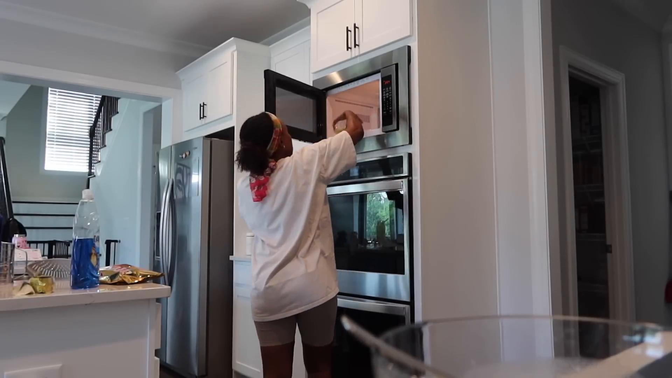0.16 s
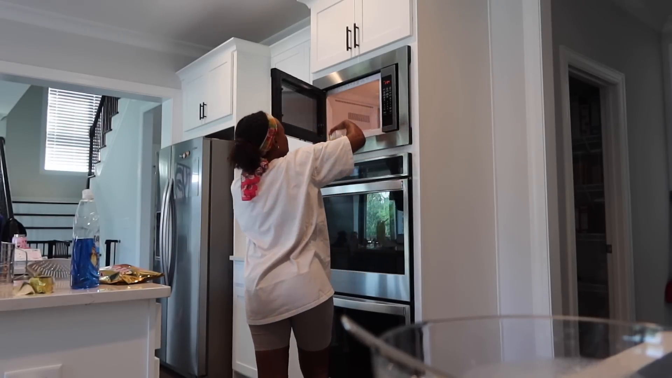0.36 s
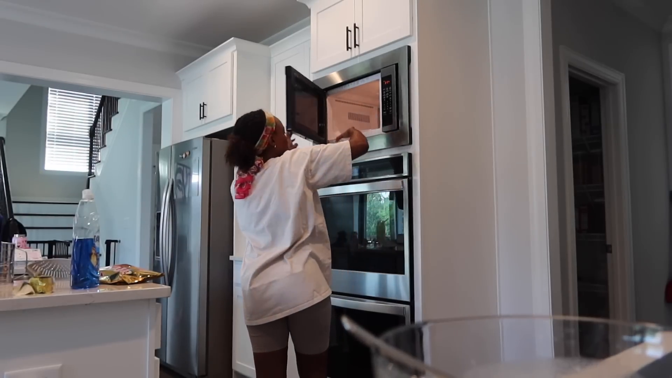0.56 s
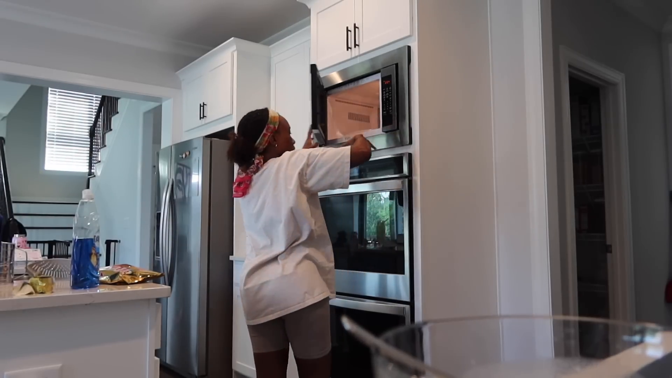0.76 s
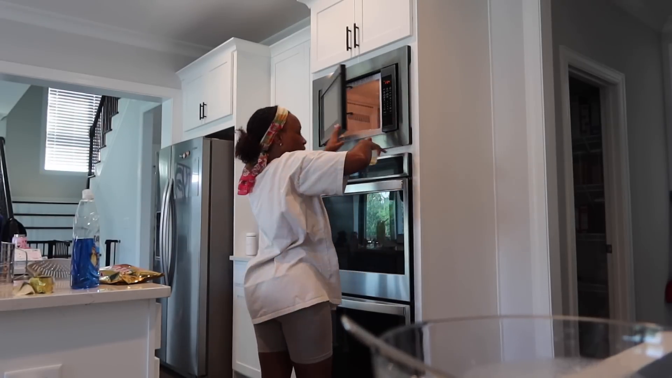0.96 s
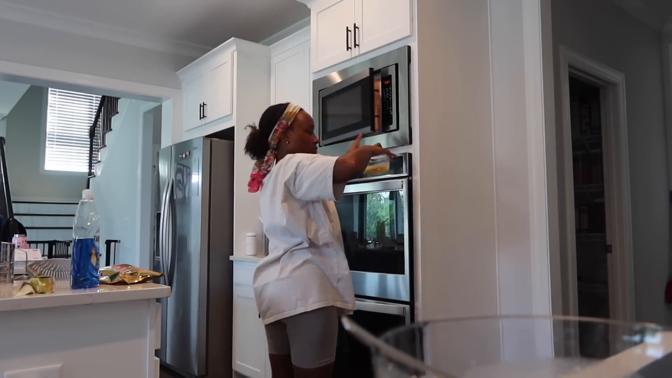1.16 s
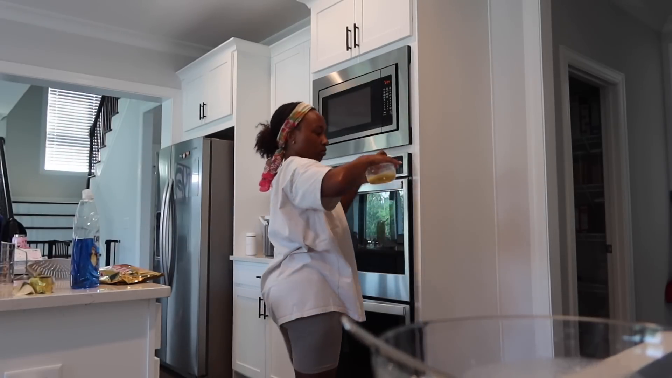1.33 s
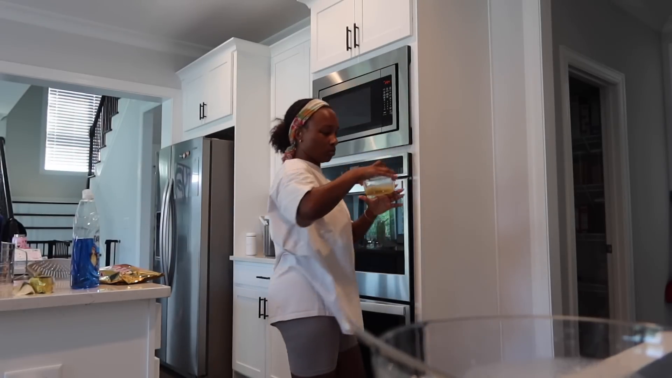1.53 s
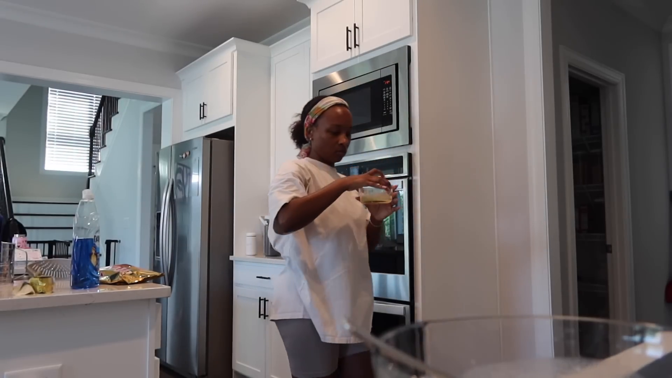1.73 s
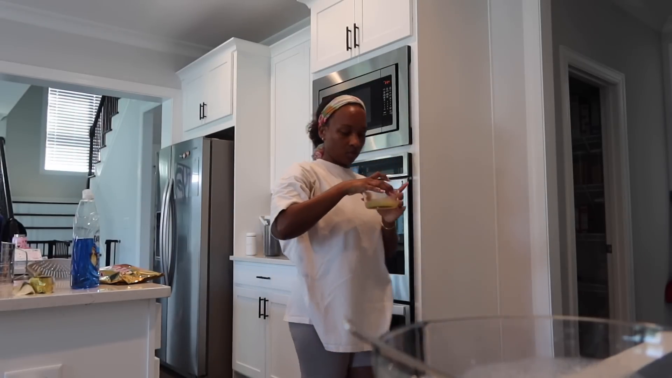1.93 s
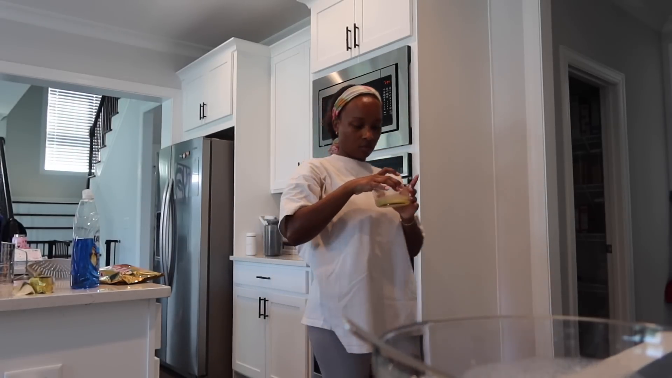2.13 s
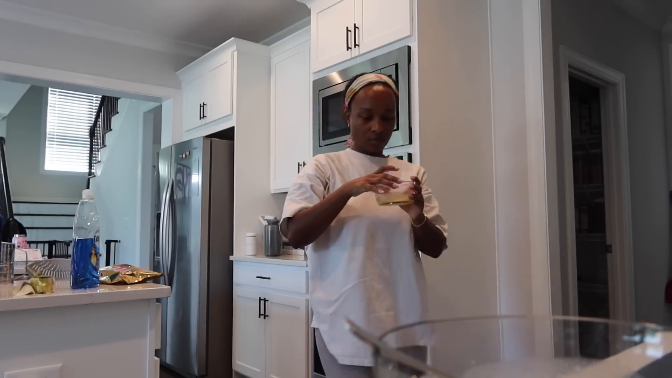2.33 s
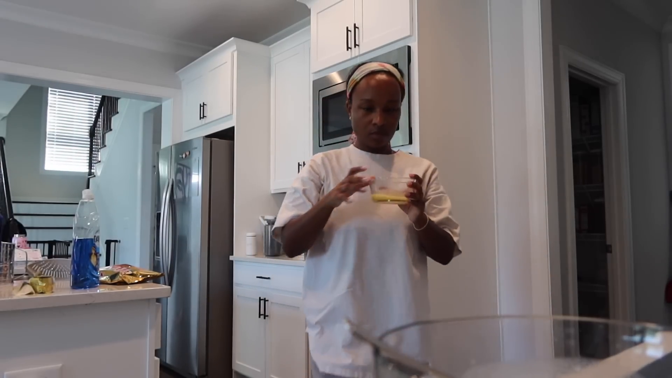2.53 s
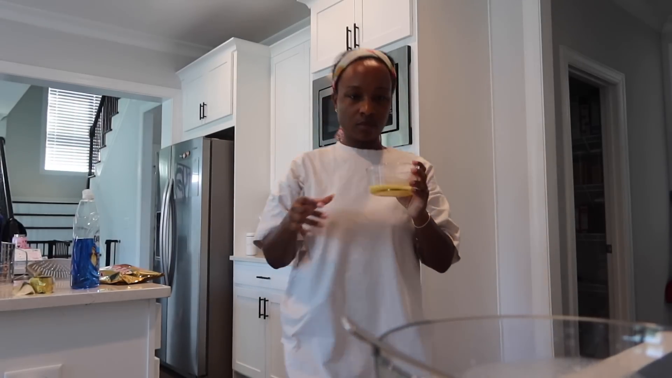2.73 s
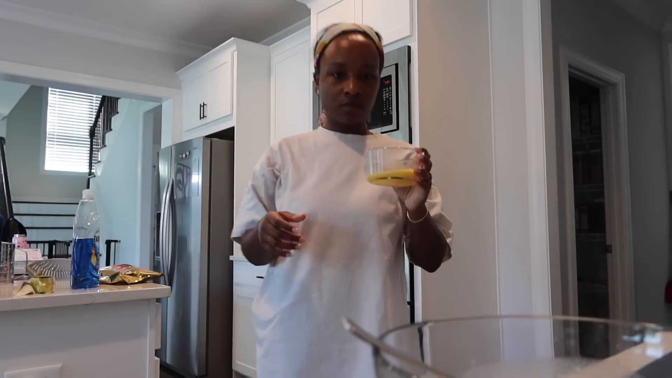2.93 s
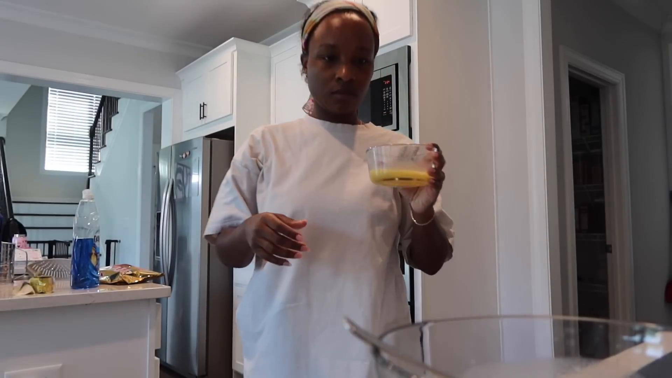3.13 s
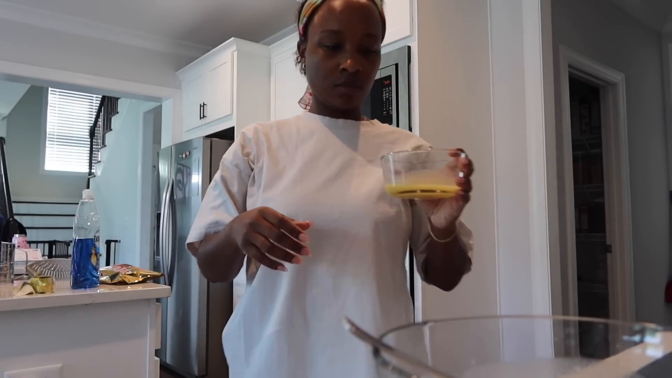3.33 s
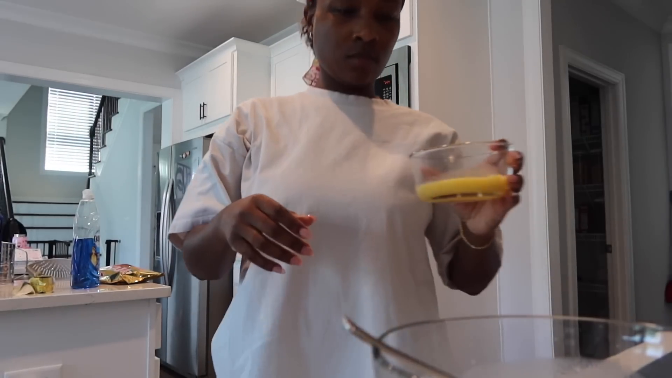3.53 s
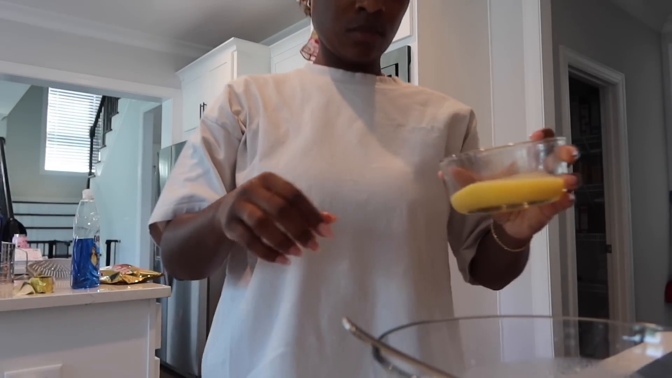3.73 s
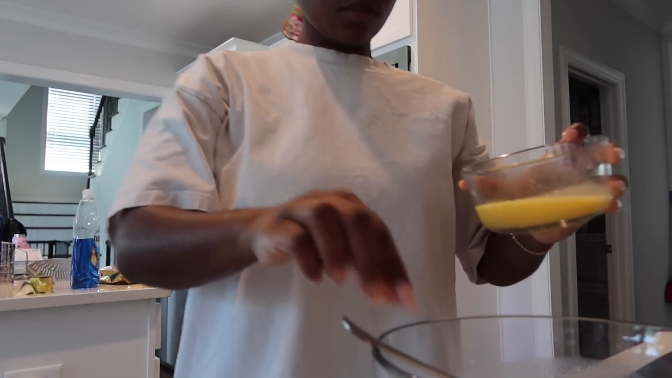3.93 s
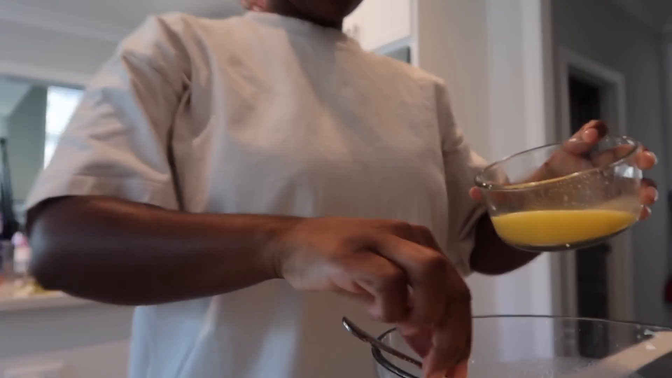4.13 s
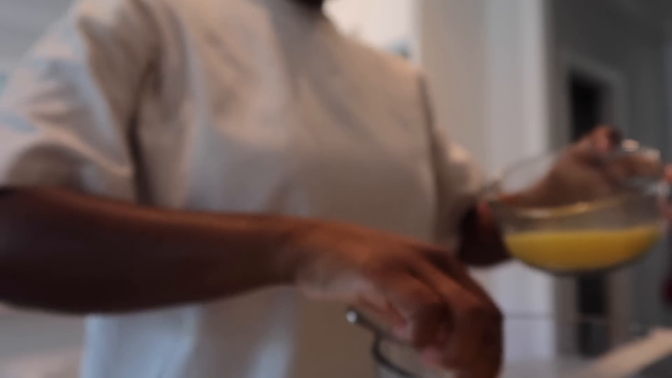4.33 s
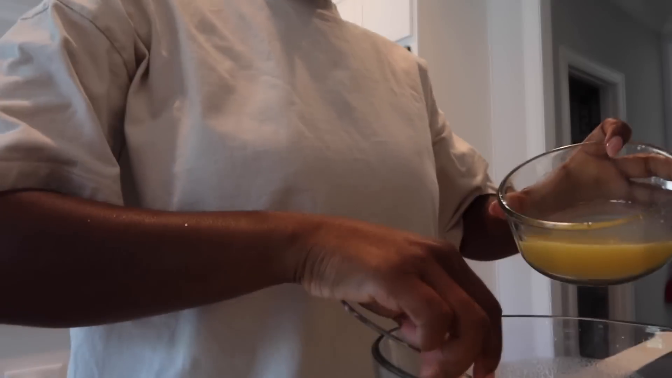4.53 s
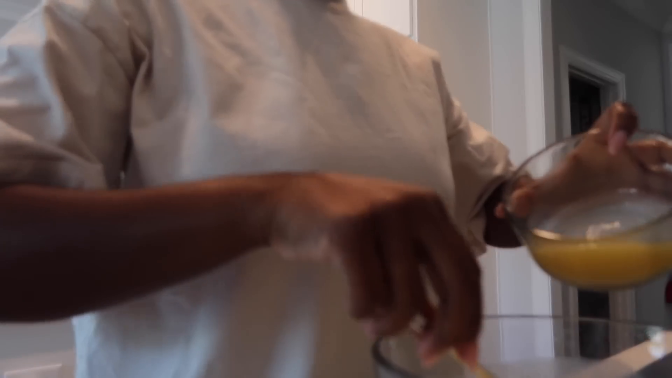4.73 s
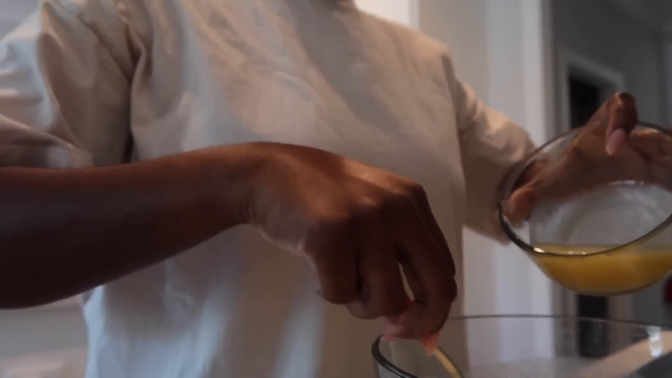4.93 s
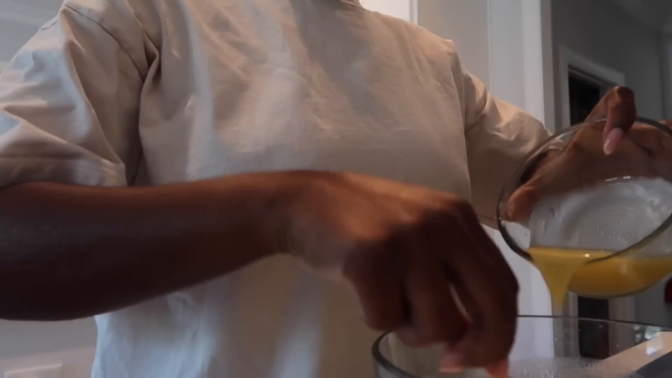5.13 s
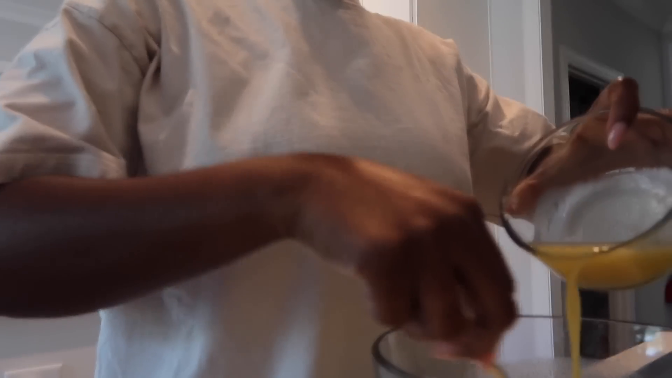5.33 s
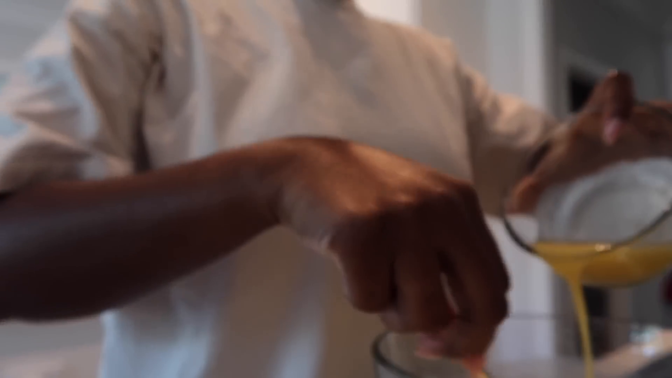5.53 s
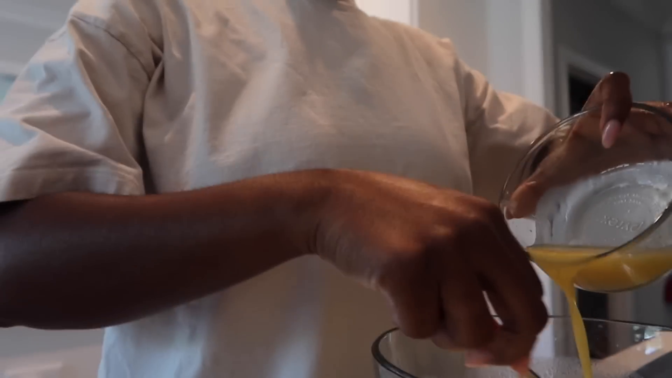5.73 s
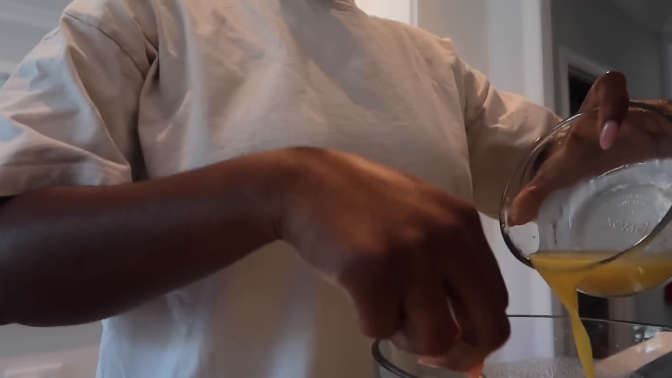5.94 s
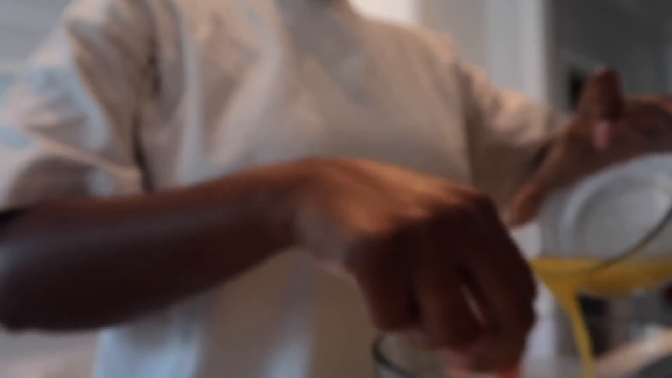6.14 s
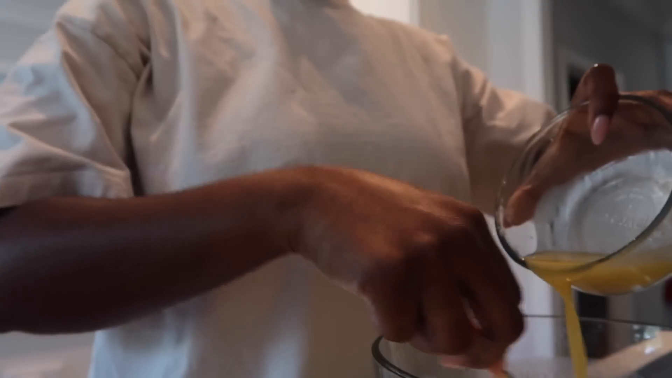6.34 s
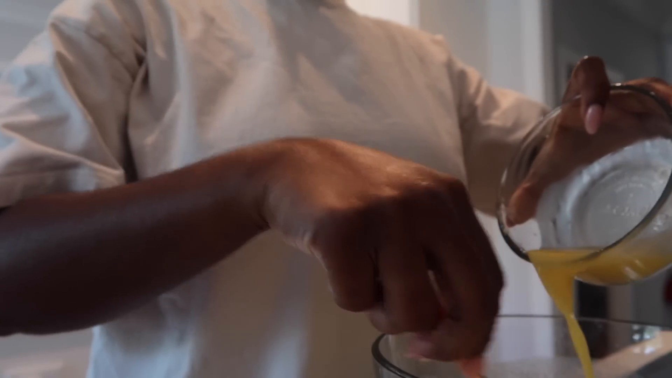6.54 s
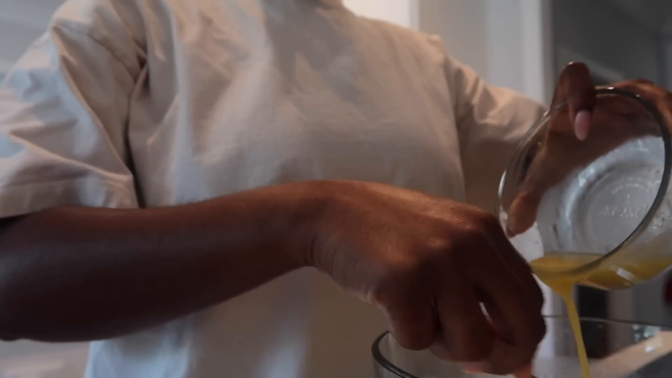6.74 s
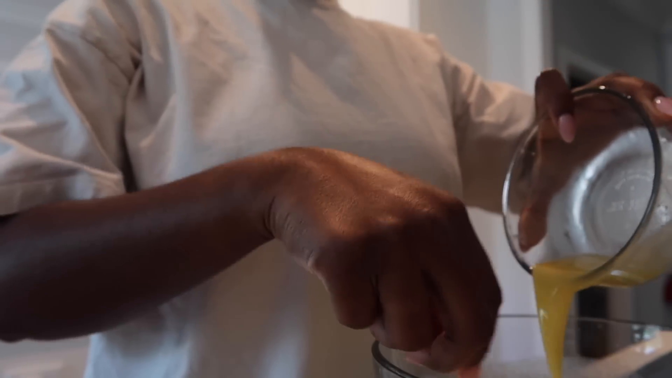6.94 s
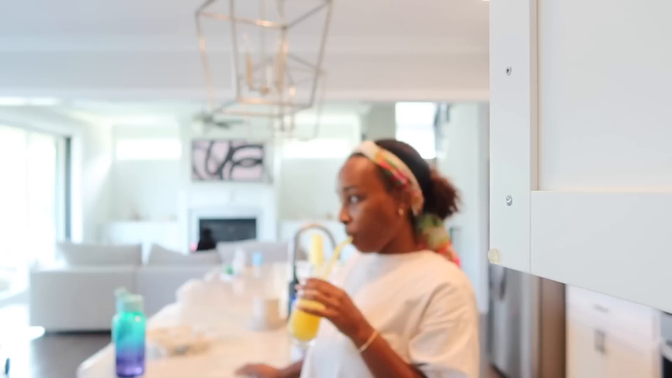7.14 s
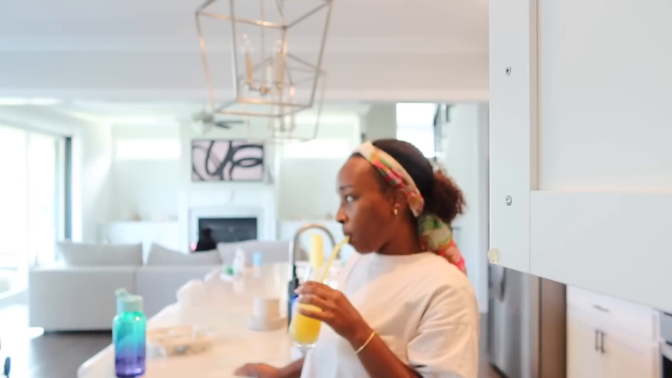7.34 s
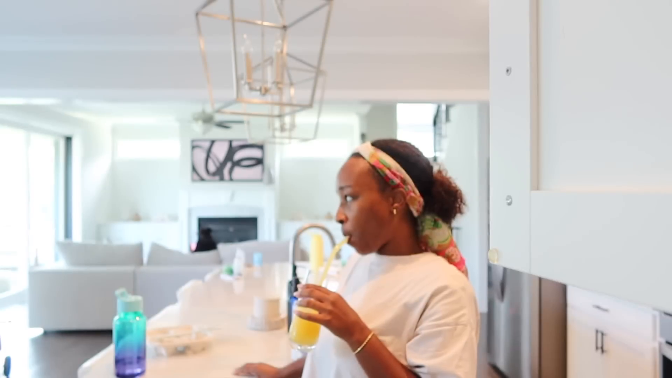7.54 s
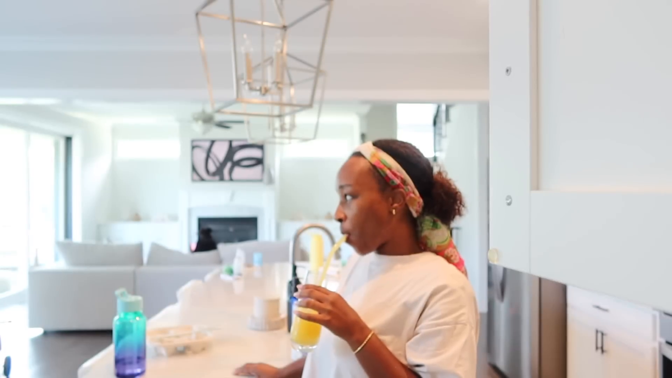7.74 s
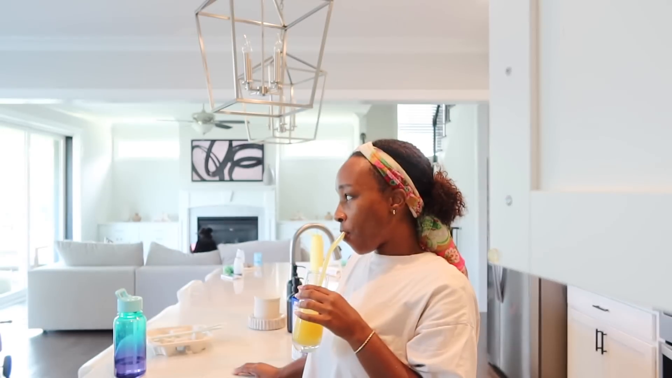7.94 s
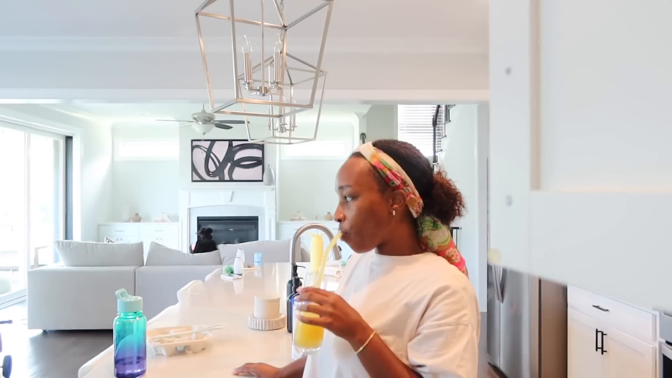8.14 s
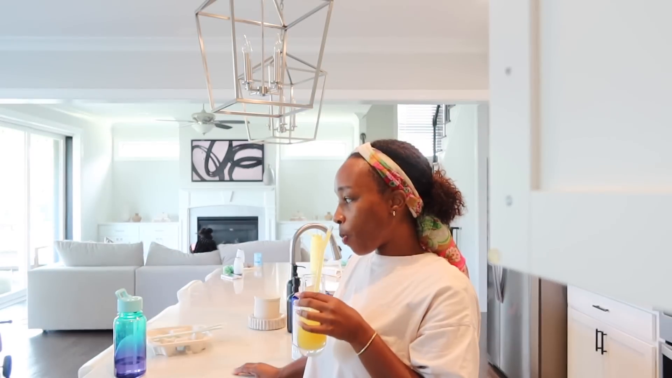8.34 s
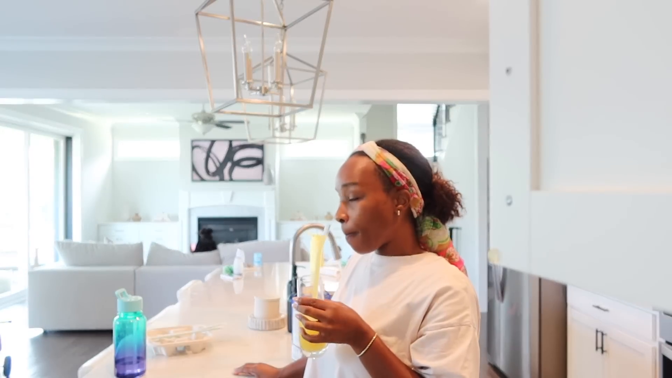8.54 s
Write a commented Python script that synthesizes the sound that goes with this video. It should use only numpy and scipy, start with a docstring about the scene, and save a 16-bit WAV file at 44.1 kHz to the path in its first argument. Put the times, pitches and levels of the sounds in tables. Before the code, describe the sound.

Steady low house hum and soft duct air run throughout, with tiny plastic lens ticks about every quarter second until 1.4, then sparse ones until 3.8. A faint thud and sole snap come at 0.2-0.4. At 1.3 an appliance door latches, slams loudest at 1.36, and rebounds until 1.6, with boxy panel rattle, low boom and roomy echo. Footsteps follow: a soft scuff near 2.2, a sharp step at 2.55, weaker ones at 3.25-3.6, a firm one at 3.9. From 4.2 to 4.6, close spoon-on-glass scraping and clustered clinks ring, with dishes knocking. From 4.7 to 7.1, duller irregular taps, about two or three a second, mix with brief wet squeaks around a batter-filled bowl, slightly right. At 7.17 tap water starts abruptly: steady hiss, metallic steel patter and brighter splashes, strongest near 7.6 and 8.5, continuing to the end.

```python
"""A home kitchen, heard by two microphones on the counter, over the steady hum and air noise of the house.
Small ticks of a lens motor come early, and now and then until the spoon. After a faint thud and step an oven door
latches, slams and rebounds, ringing its panels; then heels and soles cross the floor as thuds and noise bursts.
A spoon leaves the rim of a glass bowl and stirs, tapping and slipping on the wall: struck modes and rough tones.
Last a tap runs into a steel sink: noise for the jet, random drops on resonances. A large hard room echoes all but these."""
import sys
import numpy as np
from scipy import signal
from scipy.fft import rfft, irfft, next_fast_len
from scipy.io import wavfile
from scipy.ndimage import uniform_filter1d

SR = 44100
rng = np.random.default_rng(int(sys.argv[2]) if len(sys.argv) > 2 else 0)


def output_pcm(signal):
    """Save a mono or channel-first signal as 16-bit PCM at the path in sys.argv[1].

    Samples are clipped to [-1, 1] before scaling.
    """
    pcm = np.clip(np.atleast_2d(signal).T, -1, 1) * 32767
    wavfile.write(sys.argv[1], SR, np.round(pcm).astype(np.int16))


N = 382788
T = np.arange(N) / SR  # s

# Spectrum of the house noise, per Hz: frequency_hz, density_db
HOUSE_SPECTRUM = [(12, -40), (20, -11.5), (191, -0.5), (307, -8), (373, -4.5), (521, -14.5), (582, -15),
                  (814, -15), (962, -15), (1080, -17.5), (1420, -19), (1780, -20), (5260, -28),
                  (14300, -43.5), (15600, -56)]
# Stereo width of the house noise: frequency_hz, side_minus_mid_db
HOUSE_WIDTH = [(60, -12), (110, -18.5), (200, -7), (380, -4), (700, -1.5), (1290, -1.5), (2380, -5.5),
               (4400, -3), (8120, -3), (15000, -3)]
# Air-duct resonances: centre_hz, width_hz, boost_db over the rest
DUCT_HUM = [(103.6, 24, 4.5), (171, 21, 2), (378, 14, 4.5), (481, 43, 5)]
HOUSE_RMS_DB = -46.5

# Clock counts at which the lens motor moves: count
LENS_STEP_COUNTS = [0, 1, 2, 3, 4, 14]
# Lone lens ticks: start_s, peak_db
LENS_STRAY_TICKS = [(.5397, -56.5), (1.0735, -49), (2.7312, -50), (3.4431, -50), (3.676, -47)]
# Modes of the plastic lens housing: frequency_hz, level_db, t60_s
LENS_MODES = [(3550, -6, 0.014), (4200, 3, 0.016), (5290, 0, 0.024)]
LENS_FIRST_S, LENS_PERIOD_S, LENS_SETTLE_S = .0812, .2671, .057
LENS_STEP_DB, LENS_SETTLE_DB = -47, -47.5  # peaks

# Low thuds of heels and cabinet: start_s, peak_db, pitch_hz
LOW_THUDS = [(.16, -53, 40), (1.308, -21, 85), (1.425, -21, 105), (1.466, -21, 69.4), (1.495, -31, 101),
             (1.575, -28, 110), (1.69, -39, 75), (1.73, -38, 75), (2.01, -34, 39.1), (2.542, -28.5, 487),
             (2.548, -36.5, 119.7), (2.7, -38, 47.3), (3.361, -33, 51.6), (3.899, -34, 135),
             (3.903, -33, 625), (4.0, -32, 245), (4.024, -35, 104.6)]
HEEL_PUSH_CYCLES, HEEL_RING_CYCLES = 2.98, 2.6

# Reverberation time of the room: frequency_hz, t60_s
ROOM_T60 = [(50, 0.75), (110, 0.57), (250, 1), (600, 0.73), (1500, 0.706), (4000, 0.641), (8000, 0.336),
            (14000, 0.1325)]
# Strength of the echoes: frequency_hz, level_db
ROOM_COLOUR = [(50, -17), (110, -16), (200, -9), (320, -4), (480, 0), (10000, 0)]
# Stereo width of the echoes: frequency_hz, side_minus_mid_db
ROOM_WIDTH = [(60, -54), (110, -41), (200, -28), (380, -17), (700, -21), (1290, -16), (2380, -23.5),
              (4400, -3.5), (8120, 2.5), (15000, 10)]

# Sound from the oven side at the two microphones: frequency_hz, left_minus_right_db
OVEN_SIDE_BALANCE = [(60, 0.0), (110, 0.0), (200, 0.0), (380, 1.5), (700, 2.0), (1290, -1.0), (2380, -0.5),
                     (4400, -1.0), (8120, -0.5), (15000, -0.5)]
OVEN_SIDE_LAG_S = .000014  # the left microphone hears the oven side this much later

# Soles snap on the floor: start_s, level_db, centre_hz, length_s
SOLE_SNAPS = [(0.379, -43.5, 3430, 0.0059), (2.196, -46.5, 3540, 0.0055), (2.544, -22, 1550, 0.0014),
              (2.547, -21.5, 1790, 0.0032), (3.246, -42.5, 896, 0.0086), (3.903, -26.5, 1675, 0.0057),
              (3.941, -42, 2200, 0.0057)]
# Soles drag: middle_s, level_db, centre_hz, length_s
SOLE_SCUFFS = [(2.263, -59.5, 2370, 0.099), (3.571, -57, 1900, .06)]

# Door contacts: start_s, level_db, rattle_s, panel_weight_db, brightness_db (per octave, well above 2 kHz)
DOOR_CONTACTS = [(1.302, -15.5, 0.02, -18, -0.5), (1.354, -17, 0.0063, -1, -2),
                 (1.364, -3.5, 0.0071, -1, 5), (1.378, -10.5, 0.016, 4, -13),
                 (1.403, -15.5, 0.0077, -0.5, -18), (1.432, -20, 0.0088, 3.5, -29),
                 (1.462, -24, .006, 4.5, -12.5), (1.49, -21.5, 0.0061, -7, 0), (1.587, -32, 0.007, 3, -15)]
# Spectrum of a contact's crack, per Hz: frequency_hz, density_db
CRACK_SPECTRUM = [(290, -13), (500, -8), (657, -13), (863, -10), (1600, -6), (2040, -7), (2230, -7.5),
                  (3060, -9.5), (5670, -24), (8240, -30.5), (15500, -47)]
# Modes of door, oven case and cabinet: frequency_hz, level_db, t60_s
PANEL_MODES = [(52.3, -17, .3), (78, 6, 0.15), (70.5, -26, 2.9), (95.9, 6.5, 0.12), (152, -3.5, 0.18),
               (181, 4, 0.15), (201.6, -9, 0.39), (230, -9, 0.45), (275, -6.5, 0.29), (295, -16, 0.14),
               (381.2, 2, 0.1), (458.7, 0.5, 0.18), (531, 5, 0.11), (636, 10.5, 0.036), (724, 1.5, 0.06),
               (1215, -10, 0.08)]
# Air shut into the oven: start_s, peak_db, pitch_hz, push_cycles, t60_s
OVEN_BOOM = (1.53, -19, 90.5, 0.5, 0.38)
# The ringing glass tray: frequency_hz, peak_db, t60_s
GLASS_TRAY = (4969, -58, 3)
TRAY_STOPS_S = 2.05

# Spoon dragged over the glass: time_s, level_db
RUB_LEVEL = [(4.2, -65), (4.23, -54), (4.3, -63), (4.48, -58), (4.6, -60), (4.88, -76), (4.93, -62.5),
             (5.05, -73), (5.6, -67), (5.72, -67), (6.3, -68), (6.9, -68.5), (7.0, -57.5), (7.17, -66),
             (7.2, -76.5)]
# Modes of rim and spoon: frequency_hz, level_db, t60_s
RIM_MODES = [(1070, -5, 0.066), (1409, -5, 0.55), (1670, 2.5, 0.13), (1920, 2, 0.12), (2316, 2.5, 0.25),
             (2413, 5.5, 0.28), (3156, -3.5, 0.205), (3350, -4, 0.26), (3465, 3.5, 0.27), (3560, 3.5, 0.25),
             (3640, -4, 0.23), (4740, -9, 0.15), (6150, -11, 0.23), (7620, -13.5, 0.117),
             (9260, -22, 0.133), (11030, -23, 0.11)]
RUB_GRAINS_PER_S, RUB_HZ, RUB_OCTAVES = 450, 3260, 0.86
RUB_DAMPING = 4.4  # the rim's t60 is divided by this
BOWL_PAN_DB = -3  # left minus right

# Spoon chatters on the rim:
# start_s, peak_db, brightness_db (per octave), lasting_ring_db (against peak), chatter_s, choke_s (after start)
RIM_CLINKS = [(4.211, -25, 1.5, -7, 0.0031, .08), (4.237, -39.5, -8, -16.5, .009, .07),
              (4.296, -47, -6, -8, 0.011, .03), (4.319, -36.5, -1.5, -14, 0.013, .06),
              (4.341, -41.5, -5.5, -10.5, 0.0052, .05), (4.353, -43, -2.5, -8, 0.0048, .04),
              (4.39, -36.5, -11, -4, 0.0069, .04), (4.402, -35.5, -14, -3, 0.0076, 0.072),
              (4.435, -39.5, -16.5, -8.5, 0.0092, 0.045), (4.456, -52.5, -4.5, -16, .01, .04),
              (4.491, -37, -7, -8, 0.014, .04), (4.511, -28.5, 5.5, -11, .006, 0.037),
              (4.52, -27.5, 1.5, -2.5, 0.0091, 0.32), (4.531, -32.5, -12, -1.5, .005, .3),
              (4.555, -38, 5.5, -2, 0.0049, .3)]
CLACK_DB = -6  # against the clink's peak

# Dishes knock on the counter: start_s, peak_db, pitch_hz, t60_s
COUNTER_KNOCKS = [(4.319, -43.5, 112, .08), (4.515, -33.5, 150.7, 0.27), (4.545, -34.5, 474, 0.16),
                  (4.55, -52.5, 312, 0.17), (4.6, -35, 171, 0.091), (5.343, -32, 736, 0.11),
                  (5.345, -42, 408, 0.046), (8.088, -43, 1000, 0.029)]
KNOCK_PUSH_CYCLES, KNOCK_RATTLE_DB = 5, -0.5

# Spoon taps the wall through the batter:
# start_s, peak_db, spot_pitch_hz, tick_db (against peak), contact_s, reach_octaves (over the other modes)
WALL_TAPS = [(4.731, -32, 3250, -14, .01, 2), (4.747, -38, 2380, -18, 0.0073, 1.38),
             (4.801, -35.5, 2260, -15.5, 0.01, 1.4), (5.1445, -28.5, 2250, -10, 0.0032, .6),
             (5.34, -31, 1570, 4.5, 0.0022, 1.16), (5.6, -39, 1970, -12, 0.005, 0.46),
             (5.8524, -26.5, 2170, -10, 0.00329, 0.53), (6.058, -40, 2545, -30, 0.0047, 0.275),
             (6.2868, -32.5, 2180, -10, 0.0031, .5), (6.394, -38.5, 2810, -30, 0.00236, 0.29),
             (6.438, -23, 2526, -25, 0.0021, 0.2), (6.932, -33.5, 2700, -9.5, 0.0034, .4),
             (6.943, -31, 2070, -13, 0.0042, 0.345), (7.0933, -32, 3156, -34, .0025, 0.56),
             (7.128, -41, 3950, -30, .0015, .5)]
# Modes of the filled bowl: frequency_hz, level_db, t60_s
FILLED_BOWL_MODES = [(1300, 6, 0.09), (1870, -7, 0.089), (1985, 2.5, 0.115), (2147, 9, 0.052),
                     (2450, -1, 0.039), (2562, 10, 0.037), (3020, 10, 0.019), (3230, 10.5, 0.05),
                     (3958, 8, 0.0363), (5600, 10, 0.015), (6550, 4.5, .015)]
# Spectrum of a tap's bright tick, per Hz: frequency_hz, density_db
TICK_SPECTRUM = [(3000, -28), (5000, -12), (7500, 0), (9000, 2), (12000, 10), (14500, -3), (15500, -28)]
TAP_CLACK_DB = -10  # against the tap's peak
SPOT_T60_S, SPOT_DB = 0.049, 9

# Spoon slips along the wet wall: start_s, level_db, pitch_hz
WALL_SLIPS = [(4.903, -44, 1740), (4.916, -39, 1700), (4.952, -49, 1575), (5.03, -52, 1550),
              (5.045, -52, 1557), (5.263, -47, 1840), (5.275, -45, 1830), (5.297, -45, 2250),
              (5.316, -45, 1813), (5.922, -43, 1890), (5.94, -47, 1980), (6.142, -45, 1940),
              (6.226, -38.5, 2067), (6.249, -43, 1920), (6.558, -45, 2120), (6.59, -48.5, 1928),
              (6.609, -39.5, 2010), (6.63, -42, 1937), (6.663, -48, 3970), (6.837, -40.5, 2010),
              (6.85, -45, 2070), (6.952, -31.5, 2110), (7.021, -40, 1316), (7.045, -46, 2000)]
SLIP_S, SLIP_GLIDE = 0.0087, 0.98  # decay time; pitch ratio per decay time
STIR_START_S, STIR_END_S = 5.55, 7.1
FAINT_SLIP_DB, FAINT_SLIP_SPREAD_DB, FAINT_SLIP_HZ = -55, 6.5, 1986

# Spectrum of the tap's jet, per Hz: frequency_hz, density_db
JET_SPECTRUM = [(35, -43), (60, -41), (123, 7.5), (179, -12.5), (201, -34), (248, -27), (404, -46.5),
                (487, -3), (892, -17), (1180, -9.5), (3130, -6.5), (5740, -9.5), (9140, -17.5),
                (13900, -17.5), (15600, -32)]
# Stereo width of the jet: frequency_hz, side_minus_mid_db
JET_WIDTH = [(60, -14), (110, -24), (200, -4), (380, -11), (700, -10.5), (1290, -27), (2380, -38.5),
             (4400, -6.5), (8120, 3.5), (15000, -3.5)]
# Resonances of the steel sink: frequency_hz, width_hz, level_db
SINK_RESONANCES = [(1776, 19, -3.5), (1926, 37, -15), (2306, 19, -6.5), (2840, 52, -3), (3096, 42, -1),
                   (3570, 400, -12), (4275, 150, -3.5), (5190, 53, -17), (5685, 118, -7), (6200, 33, -12.5),
                   (6670, 53, -16)]
# Level of the drops on the steel: time_s, level_db
PATTER_LEVEL = [(7.18, -39), (7.28, -50), (7.45, -40.5), (7.52, -47), (7.62, -41), (7.74, -41), (7.92, -45),
                (8.09, -43.5), (8.18, -52), (8.21, -43), (8.31, -39), (8.4, -45), (8.43, -39), (8.51, -45),
                (8.59, -37.5), (8.68, -47)]
# Bigger splashes: start_s, peak_db, pitch_hz
BIG_SPLASHES = [(7.2252, -32.5, 5750), (7.358, -31.5, 2890), (7.54, -26.5, 4250), (7.6052, -23.5, 3100),
                (7.6596, -29, 3120), (7.702, -33, 3200), (8.2586, -29, 2824), (8.285, -36, 4390),
                (8.526, -23.5, 2900), (8.5742, -31.5, 3240)]
FLOW_ON_S, JET_DB = 7.172, -42
STEEL_FLICKER_DB, STEEL_FLICKER_PER_S = 2, 30
SMALL_SPLASH_DB, SMALL_SPLASH_SPREAD_DB = -40, 2
SPLASH_SPRAY_DB = -4.5  # against the splash's peak

TOP_HZ = 15600


def undb(db):
    """Amplitude ratio of a level in decibels."""
    return 10 ** (np.asarray(db) / 20)


def read(table, hz):
    """Value of a (Hz, value) table, interpolated on a log-frequency axis."""
    table_hz, values = np.array(table).T
    return np.interp(np.log(np.maximum(hz, 1)), np.log(table_hz), values)


def unit(x):
    """Signal scaled to rms 1."""
    return x / np.sqrt(np.mean(x ** 2))


def noise(gain_at, size):
    """Filtered noise: white noise shaped by gain_at(Hz), scaled to rms 1."""
    n = next_fast_len(size, True)
    spectrum = rfft(rng.standard_normal(n)) * gain_at(np.arange(n // 2 + 1) * SR / n)
    return unit(irfft(spectrum, n)[:size])


def wide(gain_at, side, size):
    """Diffuse stereo: unrelated mid and side noises decorrelate left and right."""
    hz = np.geomspace(20, 16000, 400)
    side_power = np.sum(hz * (gain_at(hz) * undb(read(side, hz))) ** 2)
    ratio = np.sqrt(side_power / np.sum(hz * gain_at(hz) ** 2))
    mid = noise(gain_at, size)
    rest = ratio * noise(lambda f: gain_at(f) * undb(read(side, f)), size)
    return np.array([mid + rest, mid - rest])


def bump(hz, centre_hz, octaves):
    """Gaussian band on a log-frequency axis."""
    return np.exp(-.5 * (np.log2(np.maximum(hz, 1) / centre_hz) / octaves) ** 2)


def walk(rate, size=N):
    """Slow random wander, rms 1: random steps at a rate per second, smoothed twice."""
    k = int(SR / rate)
    held = np.repeat(rng.standard_normal(size // k + 1), k)
    return unit(uniform_filter1d(uniform_filter1d(held, k), k)[:size])


def ring(modes, push, gains=None):
    """Modal synthesis: a push excites decaying sinusoids at their tabled strengths; peak 1."""
    t = np.arange(int(SR * max(m[2] for m in modes))) / SR
    gains = np.ones(len(modes)) if gains is None else gains
    body = 0
    for (hz, db, t60), gain in zip(modes, gains):
        # divide out the push's own strength at this mode, with a floor
        drive = abs(np.sum(push * np.exp(2j * np.pi * hz * np.arange(len(push)) / SR)))
        drive = drive + 0.091 * np.linalg.norm(push)
        body = body + gain * undb(db) / drive * np.sin(2 * np.pi * hz * t) * 1000. ** (-t / t60)
    out = signal.fftconvolve(body, push)
    return out / np.max(np.abs(out))


def burst(length, gain_at=np.ones_like, rise=0.15):
    """Rattling contact: smooth-spectrum noise that swells and decays over about the length (s)."""
    length = max(length, 1 / 5000)
    t = np.arange(int(8 * length * SR)) / SR / length
    shape = (1 - np.exp(-t / max(rise, .02))) ** 2 * np.exp(-t)
    x = rng.standard_normal(len(t))
    gain = gain_at(np.arange(len(t) // 2 + 1) * SR / len(t))
    for _ in range(4):  # settle on both the colour and the shape
        x = irfft(gain * np.exp(1j * np.angle(rfft(x * shape))), len(t))
        x = x / np.sqrt(uniform_filter1d(x ** 2, size=len(t) // 8 + 1) + 1e-12)
    x = irfft(gain * np.exp(1j * np.angle(rfft(x * shape))), len(t)) * np.minimum(20 * shape, 1)
    return unit(x) * np.sqrt(np.mean(shape ** 2))


def add(out, s, sound, db, pan_db=0.):
    """Interaural principle: the nearer microphone hears a sound louder and a little sooner."""
    for side, sign in enumerate((1, -1)):
        lag = int(max(-sign * pan_db, 0) / 2.0)  # samples
        i = max(int(s * SR), 0) + lag
        out[side, i:i + len(sound)] += undb(db + sign * pan_db / 2) * sound[:N - i]


def scatter(start, end, count):
    """Stratified random events, one in each equal slot: (s, spread-1 strength, pick 0-1)."""
    when, pick, size = rng.random((count, 3)).T
    return zip(start + (end - start) * (np.arange(count) + when) / count, np.sqrt(12) * (size - .5), pick)


def house():
    """Steady coloured noise with duct resonances; four frequency regions wander apart a little."""
    def colour(f):
        ducts_db = sum(db * np.exp(-.5 * ((f - c) / (w / 2)) ** 2) for c, w, db in DUCT_HUM)
        return undb(read(HOUSE_SPECTRUM, f) + ducts_db)
    hz = np.geomspace(20, 16000, 400)
    out = 0
    for low_hz, high_hz in [(0, 150), (150, 600), (600, 2500), (2500, 16000)]:
        def part(f):
            return colour(f) * (f >= low_hz) * (f < high_hz)
        strength = np.sqrt(np.sum(hz * part(hz) ** 2))
        out = out + strength * wide(part, HOUSE_WIDTH, N) * undb(0.08 * walk(2.71))
    return unit(out) * undb(HOUSE_RMS_DB)


def lens():
    """Impulsive excitation of small plastic modes: each clocked step ticks, then ticks again as it settles."""
    out = np.zeros((2, N))
    steps_s = LENS_FIRST_S + LENS_PERIOD_S * np.array(LENS_STEP_COUNTS)
    moves = [(s, LENS_STEP_DB) for s in steps_s]
    settles = [(s + LENS_SETTLE_S, LENS_SETTLE_DB) for s in steps_s]
    for s, db in moves + settles + LENS_STRAY_TICKS:
        add(out, s, ring(LENS_MODES, burst(0.00028)), db)
    return out


def thud(hz, push_cycles, t60):
    """A soft low blow: a rounded push excites a mode and its upper neighbour."""
    size = int(push_cycles / hz * SR)
    push = np.hanning(size) * np.sin(2 * np.pi * hz * np.arange(size) / SR)
    return ring([(hz, 0, t60), (hz * 1.1, -9, t60 / 2)], push)


def thuds():
    """Decay over a fixed number of cycles: the lower the thud, the longer it lasts."""
    out = np.zeros((2, N))
    for s, db, hz in LOW_THUDS:
        add(out, s, thud(hz, HEEL_PUSH_CYCLES, HEEL_RING_CYCLES / hz), db)
    return out


def room(x, gap_s=0.00093):
    """Diffuse reverberation: echoes build up after a short gap and decay band by band."""
    t = np.arange(SR) / SR
    tail = 0
    for hz in 45 * 2 ** np.arange(0, 8.6, .5):
        decay = 1000. ** (-t / read(ROOM_T60, hz))
        band = wide(lambda f: bump(f, hz, 0.43), ROOM_WIDTH, SR)
        tail = tail + np.sqrt(hz) * undb(read(ROOM_COLOUR, hz)) * band * decay
    tail = tail * np.clip(t / gap_s - 1, 0, 1)
    tail = tail / np.sqrt(np.sum(tail ** 2) / 2)
    return signal.fftconvolve(x.mean(0)[None], tail, axes=1)[:, :N]


def ports(x):
    """Level and time differences: the oven side reaches the two microphones with unlike colour and delay."""
    n = next_fast_len(N, True)
    hz = np.arange(n // 2 + 1) * SR / n
    half = undb(read(OVEN_SIDE_BALANCE, hz) / 2) * np.exp(-1j * np.pi * hz * OVEN_SIDE_LAG_S)
    return irfft(rfft(x, n) * np.array([half, 1 / half]), n)[:, :N]


def steps():
    """Impact and friction noise: soles snap as short bursts and drag as swelling bands of noise."""
    out = np.zeros((2, N))
    for s, db, hz, length in SOLE_SNAPS:
        add(out, s, burst(length, lambda f: bump(f, hz, 0.64)), db)
    for s, db, hz, length in SOLE_SCUFFS:
        size = int(4 * length * SR)
        drag = np.hanning(size) * noise(lambda f: bump(f, hz, 0.69), size)
        add(out, s - 2 * length, drag, db)
    return out


def door():
    """Impact radiation: latch, hook, slam and rebounds each crack and shake the panels; air and tray ring on."""
    out = np.zeros((2, N))
    signs = (-1.) ** np.arange(len(PANEL_MODES))  # neighbouring modes move in opposite phase
    for s, db, length, weight_db, tilt_db in DOOR_CONTACTS:
        crack = burst(length, lambda f: undb(read(CRACK_SPECTRUM, f) + tilt_db * np.log2(1 + f / 2000)))
        add(out, s, crack, db)
        add(out, s, ring(PANEL_MODES, np.hanning(int(0.000855 * SR)), signs), db + weight_db)
    boom_s, boom_db, *boom = OVEN_BOOM
    add(out, boom_s, thud(*boom), boom_db)
    slam_s = DOOR_CONTACTS[2][0]
    tray = ring([GLASS_TRAY], np.ones(1))[:int((TRAY_STOPS_S - slam_s) * SR)]
    add(out, slam_s, tray * signal.windows.tukey(len(tray), .15), GLASS_TRAY[1])
    return out


def rub():
    """Granular friction: uneven grains of a dragged spoon keep the partly damped rim murmuring."""
    grains = (rng.random(N) < RUB_GRAINS_PER_S / SR) * rng.standard_normal(N) * undb(3.1 * walk(30))
    damped = [(hz, db, t60 / RUB_DAMPING) for hz, db, t60 in RIM_MODES]
    weights = bump(np.array(RIM_MODES)[:, 0], RUB_HZ, RUB_OCTAVES)
    murmur = unit(signal.fftconvolve(grains, ring(damped, np.ones(1), weights))[:N])
    level = undb(np.interp(T, *np.transpose(RUB_LEVEL)))
    return murmur * level * undb(np.array([[.5], [-.5]]) * BOWL_PAN_DB)


def clinks():
    """Contact damping: chatter on the rim gives a choked ring, a lasting ring that is cut off, and a clack."""
    out = np.zeros((2, N))
    rim_hz = np.array(RIM_MODES)[:, 0]
    choked = [(hz, db, t60 / 7) for hz, db, t60 in RIM_MODES]
    for s, db, tilt_db, free_db, length, free_s in RIM_CLINKS:
        # each spot favours other modes
        spot = undb(tilt_db * np.log2(rim_hz / 2500) + 2.6 * rng.standard_normal(len(RIM_MODES)))
        chatter = burst(length, rise=0.642)
        add(out, s, ring(choked, chatter, spot), db, BOWL_PAN_DB)
        free = ring(RIM_MODES, chatter, spot)
        add(out, s, free * np.exp(-(T[:len(free)] / free_s) ** 4), db + free_db, BOWL_PAN_DB)
        clack = burst(length, lambda f: bump(f, 2395, 0.42), rise=0.18)
        add(out, s, clack, db + CLACK_DB, BOWL_PAN_DB)
    return out


def knocks():
    """Impact of dishes on the counter: a resonant thud and a rough rattle around its pitch."""
    out = np.zeros((2, N))
    for s, db, hz, t60 in COUNTER_KNOCKS:
        add(out, s, thud(hz, KNOCK_PUSH_CYCLES, t60), db)
        add(out, s, burst(t60 / 9, lambda f: bump(f, 0.93 * hz, 1.0)), db + KNOCK_RATTLE_DB)
    return out


def taps():
    """Modes damped by the filling: a tap excites those near its spot's pitch, with a clack and a bright tick."""
    out = np.zeros((2, N))
    bowl_hz = np.array(FILLED_BOWL_MODES)[:, 0]
    for s, db, hz, tick_db, contact, reach in WALL_TAPS:
        modes = FILLED_BOWL_MODES + [(hz, SPOT_DB, SPOT_T60_S)]
        weights = np.r_[bump(bowl_hz, hz, reach), 1]
        add(out, s, ring(modes, burst(contact), weights), db, BOWL_PAN_DB)
        add(out, s, burst(contact, lambda f: bump(f, hz, 0.264)), db + TAP_CLACK_DB, BOWL_PAN_DB)
        tick = burst(0.0044, lambda f: undb(read(TICK_SPECTRUM, f)), rise=0.17)
        add(out, s, tick, db + tick_db, BOWL_PAN_DB)
    return out


def slips():
    """Stick-slip friction: short rough squeaks on a gliding pitch, with fainter ones scattered in the stirring."""
    out = np.zeros((2, N))
    faint = [(s, FAINT_SLIP_DB + FAINT_SLIP_SPREAD_DB * size, FAINT_SLIP_HZ * (1 + .12 * (pick - .5)))
             for s, size, pick in scatter(STIR_START_S, STIR_END_S, count=24)]
    u = np.arange(int(4 * SLIP_S * SR)) / (SLIP_S * SR)  # time in decay times
    envelope = (1 - np.exp(-u / 0.227)) * np.exp(-u)
    for s, db, hz in WALL_SLIPS + faint:
        # stick and slip roughen the tone
        grip = 1 + 0.56 * noise(lambda f: 1 / (1 + (f / 400) ** 2), 2048 + len(u))[:len(u)]
        tone = np.sin(2 * np.pi * np.cumsum(hz * SLIP_GLIDE ** (u - .5)) / SR)
        add(out, s, grip * tone * envelope, db, BOWL_PAN_DB)
    return out


def water():
    """Turbulence and forced resonance: a hissing jet, drops ringing the steel, and splashes with spray."""
    size = next_fast_len(N - int(FLOW_ON_S * SR) + 1, True)
    spray = wide(lambda f: undb(read(JET_SPECTRUM, f)), JET_WIDTH, size) * undb(1.1 * walk(40.6, size))
    hz = np.arange(size // 2 + 1) * SR / size
    steel = 0
    for f, w, db in SINK_RESONANCES:  # each resonance is driven by its own drops
        drops = (rng.random(size) < 260 / SR) * rng.standard_normal(size)
        flicker = undb(STEEL_FLICKER_DB * walk(STEEL_FLICKER_PER_S, size))
        push = (unit(drops) + 0.5 * rng.standard_normal(size)) * flicker
        steel = steel + rfft(push) * undb(db) / (1 + 2j * (hz - f) / w)
    patter = undb(np.interp(T[-size:], *np.transpose(PATTER_LEVEL))) * unit(irfft(steel, size))
    out = np.zeros((2, N))
    out[:, -size:] = undb(JET_DB) * spray + patter
    out = out * np.clip((T - FLOW_ON_S) / 0.0012, 0, 1)
    # small splashes sound at one of six sink resonances
    small = [(s, SMALL_SPLASH_DB + SMALL_SPLASH_SPREAD_DB * spread, SINK_RESONANCES[3 + int(pick * 6)][0])
             for s, spread, pick in scatter(FLOW_ON_S, T[-1], count=24)]
    for s, db, f in BIG_SPLASHES + small:
        add(out, s, ring([(f, 0, .022), (f * 1.42, -5, .02)], burst(0.00256)), db)
        add(out, s, burst(0.0057, lambda x: bump(x, 3000, 0.51)), db + SPLASH_SPRAY_DB)
    return out


def scene():
    """Superposition: direct sounds plus the room's echoes of door, steps, thuds, bowl and dishes."""
    low, feet, slam = thuds(), steps(), door()
    dishes = rub() + clinks() + knocks() + taps() + slips()
    echoes = room(undb(0.5) * slam + undb(2.5) * feet + undb(3.3) * low + undb(-10) * dishes)
    return ports(slam + feet + echoes) + low + dishes + lens() + water() + house()


def record(dry):
    """Band limits and soft saturation: the deepest bass is cut, loud peaks are rounded, the top is cut."""
    mic = signal.sosfilt(signal.butter(2, 32, "high", fs=SR, output="sos"), dry)
    rounded = np.tanh(0.71 * mic) / 0.7
    return signal.sosfilt(signal.ellip(10, .2, 70, TOP_HZ, fs=SR, output="sos"), rounded)


dry = scene()
out = record(dry)
output_pcm(out)
```